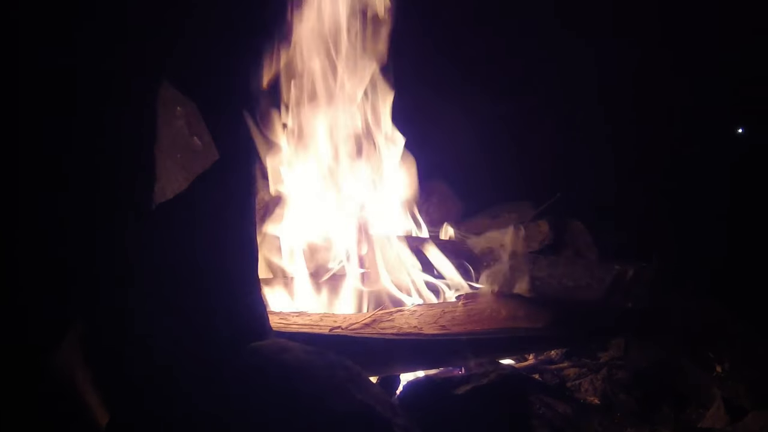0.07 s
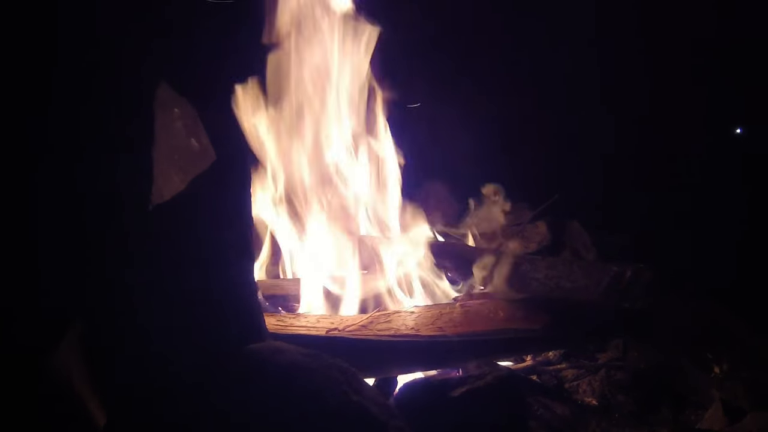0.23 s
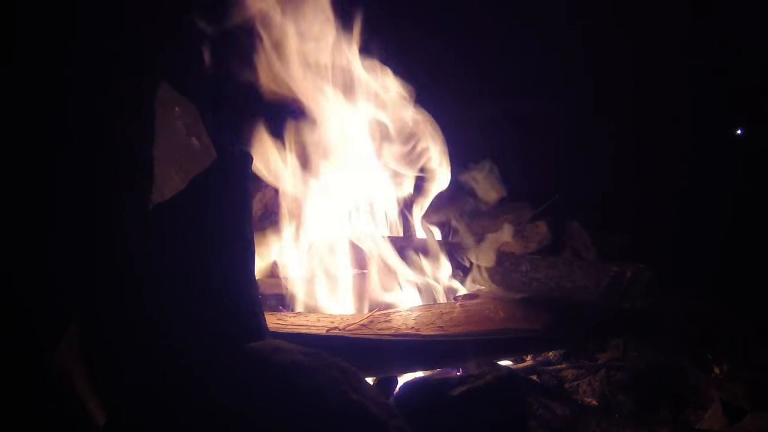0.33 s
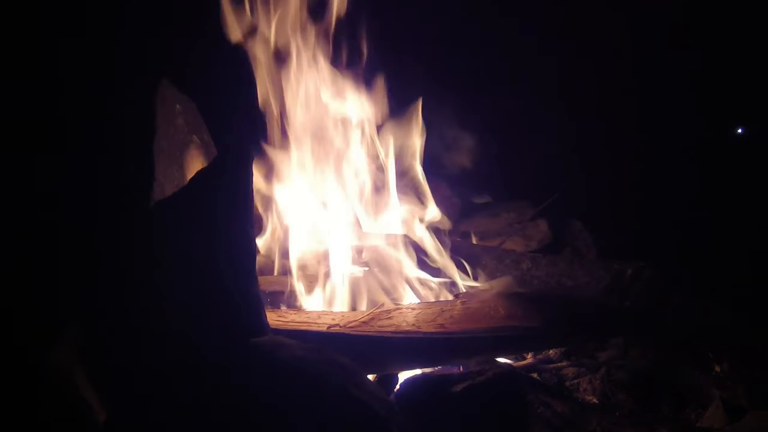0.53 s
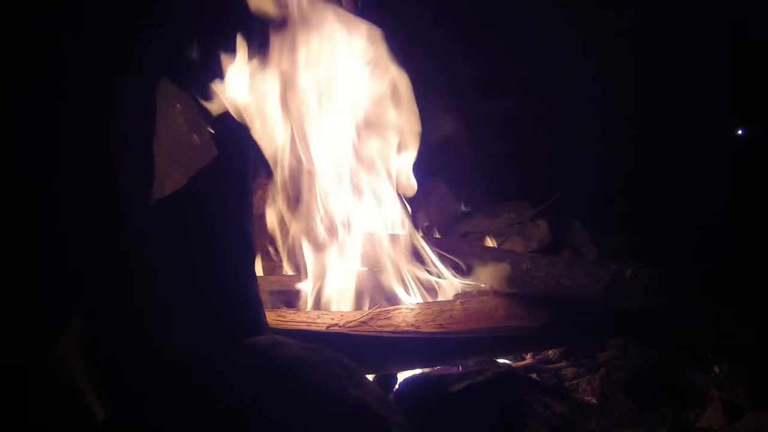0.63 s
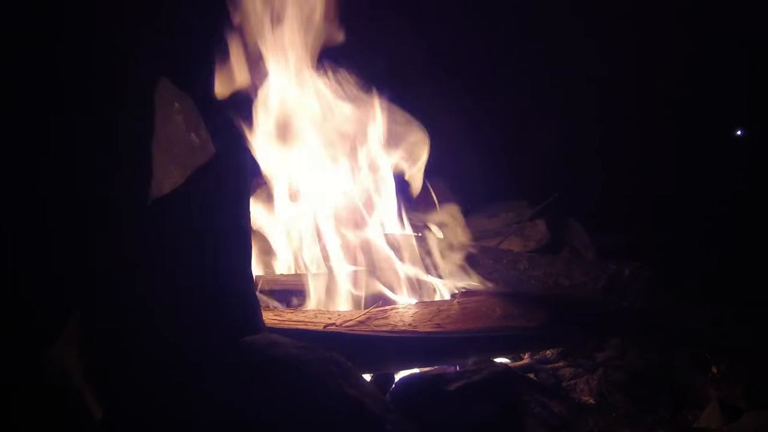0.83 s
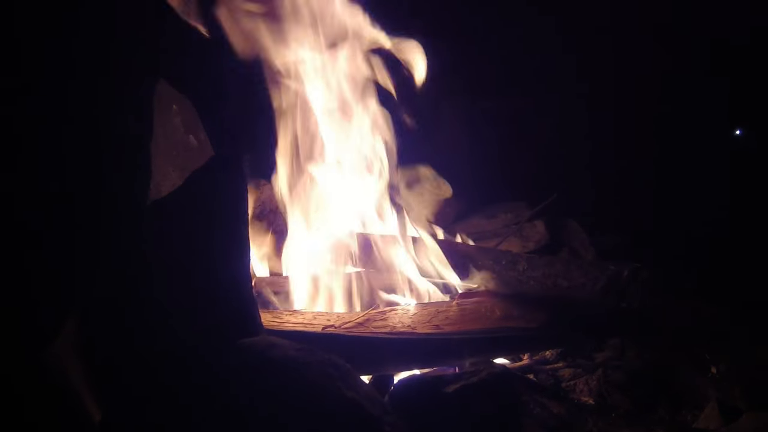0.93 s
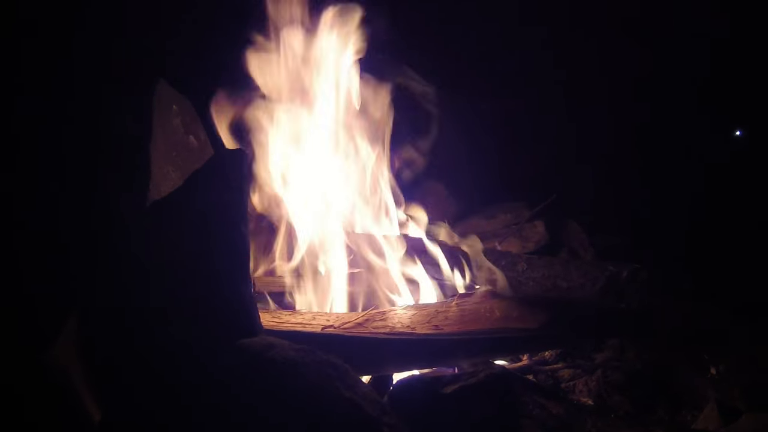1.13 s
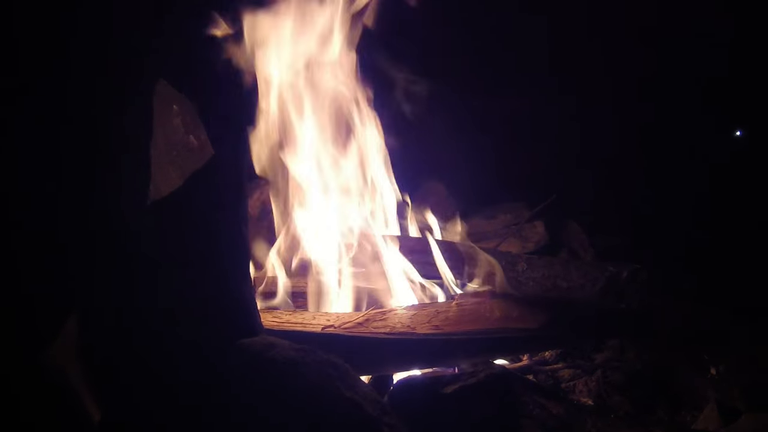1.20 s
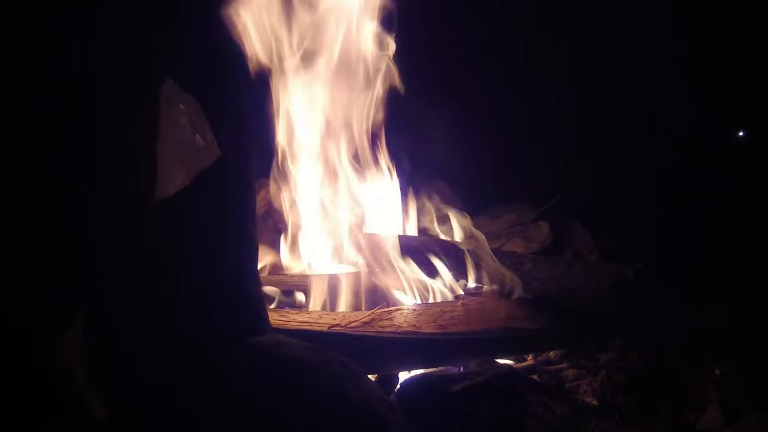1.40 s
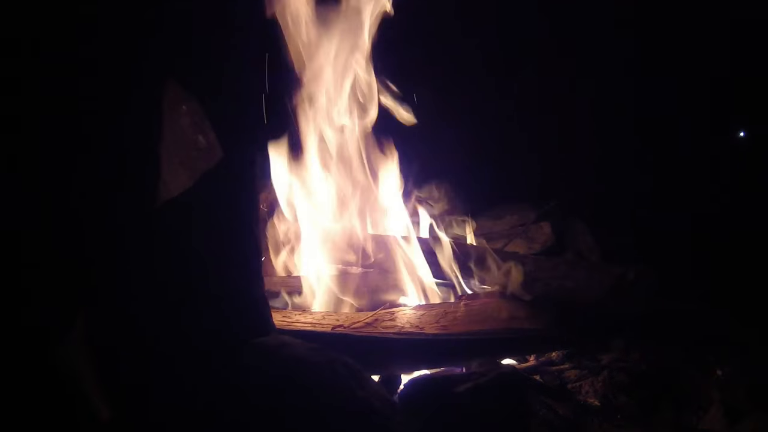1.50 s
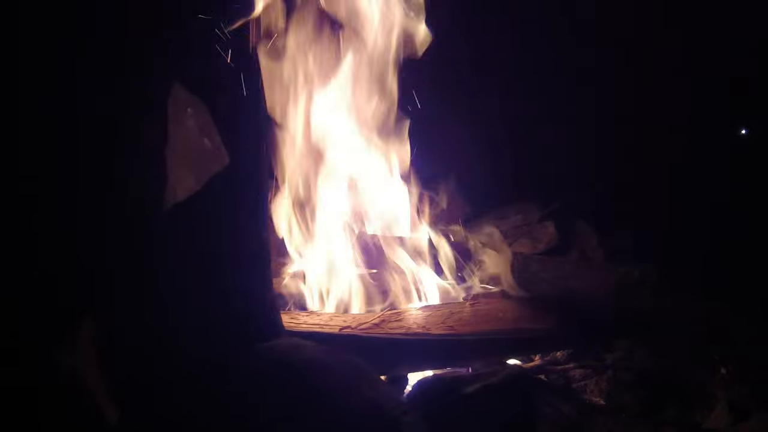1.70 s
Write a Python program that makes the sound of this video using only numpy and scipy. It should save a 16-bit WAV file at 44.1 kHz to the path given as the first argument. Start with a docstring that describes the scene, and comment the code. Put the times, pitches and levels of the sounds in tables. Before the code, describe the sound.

A wood fire crackles close by, with small snaps and two loud sharp pops.

```python
"""Outdoors at night, a wood fire burns close to a small microphone whose port resonates near 6 kHz.
The wood cracks in impulses followed by tearing fibres, spits a jet of steam, and twice pops loudly
as a bursting gas pocket rings a log with a hollow knock. Burning gas rumbles, sap sizzles, embers
tick and the surroundings return a faint echo. A preset gain curve stands for the recorder's limiter,
which ducks the background just before the last loud pop and holds it low."""
import sys
import numpy as np
from scipy import signal
from scipy.fft import rfft, irfft, next_fast_len
from scipy.io import wavfile
from scipy.ndimage import map_coordinates

SR = 44100
rng = np.random.default_rng(int(sys.argv[2]) if len(sys.argv) > 2 else 0)


def transcribe(signal):
    """Save signal, clipped to [-1, 1], as a 16-bit WAV file at the path in sys.argv[1]."""
    frames = np.atleast_2d(signal).T
    limited = np.clip(frames, -1, 1)
    pcm = np.round(limited * 32767).astype(np.int16)
    wavfile.write(sys.argv[1], SR, pcm)


N = 77175

# Spectrum of a crack heard through the resonant port: frequency_hz, gain_db
PORT_RESPONSE = [(30, -13), (120, -2), (250, -2), (600, 3), (1000, -8.5), (1500, -6), (2500, -8),
                 (3200, -9), (3900, -12.5), (5300, -0.5), (5900, 1), (6500, 3), (7100, 0), (7800, -9),
                 (9000, -7.5), (10800, -10.5), (11800, -24), (15000, -41)]


def amp(db):
    """Decibels to amplitude ratio."""
    return 10 ** (np.asarray(db) / 20)


def unit(x):
    """Normalisation to rms 1."""
    return x / np.sqrt(np.mean(x ** 2) + 1e-20)


def along(points, hz):
    """Interpolation of (frequency_hz, value) points on a log frequency axis."""
    knots_hz, values = np.transpose(points)
    return np.interp(np.log(hz + 1), np.log(knots_hz + 1), values)


def level(points):
    """Gain envelope interpolated from (time_s, level_db) points."""
    return amp(np.interp(np.arange(N) / SR, *np.transpose(points)))


def wobble(rate_hz):
    """Smooth random modulation: a spline through Gaussian knots."""
    knots = rng.standard_normal(int(N * rate_hz / SR) + 4)
    return map_coordinates(knots, [np.arange(N) * rate_hz / SR])


def colour(x, *spectra):
    """Minimum-phase filter whose gain is the sum of (frequency_hz, gain_db) spectra."""
    size = 2 * next_fast_len(len(x))
    hz = np.fft.rfftfreq(size, 1 / SR)
    gain = amp(sum(along(spectrum, hz) for spectrum in spectra))
    cepstrum = irfft(np.log(gain), size)
    cepstrum[1:size // 2] *= 2  # folding onto positive time makes the filter causal
    cepstrum[size // 2 + 1:] = 0
    return irfft(rfft(x, size) * np.exp(rfft(cepstrum)), size)[:len(x)]


def fade(t, t60_s):
    """Exponential decay, 60 dB in t60_s."""
    return amp(-60 * t / max(t60_s, 1e-4))


def burst(t, t60_s):
    """Exponentially damped noise of energy 1."""
    noise = rng.standard_normal(len(t)) * fade(t, t60_s)
    return noise / np.linalg.norm(noise)


def add(track, start_s, x):
    """Superposition of x on the track."""
    part = track[max(round(start_s * SR), 0):][:len(x)]
    part += x[:len(part)]


def cracks():
    """Brittle fracture: an impulse, a brief tearing of fibres and scattering among the logs."""
    # Fractures: start_s, energy_db, body_db, low_mid_db, high_mid_db, top_db, air_db, tear_t60_s
    fractures = [(0.051, -27.5, 0, -5, -15, -25.5, -4, .003),
                 (0.0596, -27, -20, -3.5, -5, -8.5, -13, 0.0055),
                 (0.0774, -37, -11, -7, -14, 1.5, -2, .002), (0.1347, -25.5, -4, -9, -24, -20, -25, 0.0033),
                 (0.2317, -14.5, 15.5, -15, -1, -9, -3, 0.019), (0.237, -15, -5, -32, -18, -9, 0, 0.016),
                 (0.2837, 2.5, 3, 7.5, 4, -23, -28, 0.013), (.2963, 0, -3, 1.5, -2, -8, -7, .007),
                 (0.329, -21.5, -7, -5, -9, -15, -10, 0.0037),
                 (0.4314, -30.5, -11, -18, -18, -9, -15, .003),
                 (0.5292, -24, -13, -4, -11, -11, -8, 0.0037), (0.7512, -34.5, 2, 17, 10, 6, 9, .003),
                 (0.869, -28, -16, 5, -8, -5, 0, .004), (.8869, -23.5, -13, -6, 4, -4, -1, 0.00067),
                 (1.0175, -32.5, -7, 0, -3, -3, 0, .002), (1.1667, -16, -15, -8, 5, -12, -1, 0.0019),
                 (1.2622, -29, -13, -6, -7, -8, -11, 0.0043), (1.3331, -26.5, -11.5, 1, -9, -12, 6, 0.0028),
                 (1.3901, -28.5, -2, -3, -4, -6, -4, 0.0024), (1.4009, -15, -6, -4.5, 2, -20, -10, 0.0079),
                 (1.4773, 6, -1, -8.5, 3, 8.5, -2, 0.0065), (1.5136, -21.5, 4, -3, 3.5, -20, -4, 0.0029),
                 (1.5521, -30.5, -4, 5.5, 14, -2, -8.5, 0.003)]
    # Body, low mid, high mid, treble (the 0 dB reference), top and air bands: centre_hz
    band_centres = [600, 1500, 2700, 6000, 10000, 12500]
    # Tearing fibres, thinner than the snap: frequency_hz, gain_db
    fibre_spectrum = [(100, -14), (900, -5.5), (2500, 5), (6000, 0.5)]
    # Scattering among the logs: frequency_hz, gain_db
    scatter_spectrum = [(100, 6), (600, -2), (1500, -3), (6500, 1.5), (8000, 2.5), (10000, -1)]
    out, t = np.zeros(N), np.arange(SR // 16) / SR
    for start_s, energy_db, body, low, high, top, air, tear_t60_s in fractures:
        tear_gain = amp(2) * np.sqrt(tear_t60_s / 0.0036)  # energy grows with duration
        tear = tear_gain * colour(burst(t, tear_t60_s), fibre_spectrum)
        scatter = amp(-5) * colour(burst(t, t60_s=0.023), scatter_spectrum)
        excitation = tear + scatter
        excitation[0] = 1  # the impulse
        band_gains = list(zip(band_centres, (body, low, high, 0, top, air)))
        snap = colour(excitation, PORT_RESPONSE, band_gains)
        add(out, start_s, amp(energy_db) * snap / np.linalg.norm(snap))
    return out


def knocks(rise_s=0.0005):
    """Damped free vibration: a bursting gas pocket excites the modes of a log."""
    # Hollow ringing of the logs: start_s, pitch_hz, level_db, t60_s
    log_modes = [(0.2861, 67, -15, 0.041), (0.2871, 256.5, -16, 0.025), (.2872, 732, -39, 0.097),
                 (1.4774, 255, -15.5, 0.01), (1.4775, 738, -13, 0.011), (1.5136, 214, -39, 0.029)]
    out, t = np.zeros(N), np.arange(SR // 8) / SR
    for start_s, pitch_hz, level_db, t60_s in log_modes:
        omega = 2 * np.pi * pitch_hz
        swing = np.sin(omega * t) * fade(t, t60_s) * (1 - np.exp(-t / rise_s))
        add(out, start_s, amp(level_db) * np.gradient(swing, t) / omega)
    return out


def steam_jet(start_s=0.232, rise_s=0.00063):
    """Jet noise: steam escapes from a split and dies away as the pressure falls."""
    # Hiss of the jet: frequency_hz, gain_db
    jet_spectrum = [(40, 7), (250, 13), (700, 0), (1300, -10), (2800, -5), (3900, -15), (5400, 3),
                    (6500, -14), (7800, 8), (9500, -20), (13500, -12), (15000, -32)]
    t = np.maximum(np.arange(N) / SR - start_s, 0)
    hiss = unit(colour(rng.standard_normal(N), jet_spectrum))
    envelope = (1 - np.exp(-t / rise_s)) * fade(t, t60_s=0.18)
    return amp(-38.5) * hiss * envelope


def flames(flutter_db=0.8):
    """Combustion noise: burning gas gives a low rumble with random amplitude modulation."""
    # Spectral density of the rumble: frequency_hz, density_db
    flame_spectrum = [(12, -35), (22, -5), (55, 1), (85, -7), (124, -9.5), (184, -15), (245, -17.5),
                      (335, -21.5), (420, -32.5), (600, -32), (1300, -68)]
    # Level of the rumble: time_s, level_db
    flame_levels = [(0, -38.5), (.06, -46.5), (.1, -49), (.15, -47), (.23, -40), (.33, -40), (.42, -48.5),
                    (.6, -44), (.75, -48.5), (.88, -45.5), (1.03, -45), (1.2, -48), (1.32, -46),
                    (1.42, -44), (1.45, -49.5), (1.56, -54.5), (1.64, -49), (1.75, -53.5)]
    flutter = amp(flutter_db * wobble(rate_hz=30))
    rumble = colour(rng.standard_normal(N), flame_spectrum)
    return level(flame_levels) * unit(flutter * rumble)


def embers(ticks_per_s=60, spread_db=3.3, sway_db=0.5):
    """Broadband noise of sizzling sap, dotted with a Poisson process of tiny ticks."""
    # Spectral density of the sizzle: frequency_hz, density_db
    sizzle_spectrum = [(200, -13.5), (400, 1), (520, -1), (700, -1.5), (1000, -4.5), (1500, -6.5),
                       (2500, -8), (3600, -12), (4500, -12.5), (5300, -3), (5900, -7), (6500, 1),
                       (7100, -6.5), (7800, -6.5), (9000, -11.5), (10300, -18.5), (13200, -18),
                       (14200, -42)]
    sizzle_gain = amp(-56.5 + sway_db * wobble(rate_hz=23.74))
    sizzle = sizzle_gain * unit(colour(rng.standard_normal(N), sizzle_spectrum))
    tick_sizes = amp(-46 + spread_db * np.minimum(rng.exponential(size=N), 3))
    ticks = tick_sizes * (rng.random(N) < ticks_per_s / SR)
    return sizzle + colour(ticks, PORT_RESPONSE)


def surroundings(x):
    """Reverberation: convolution with a faint noise tail in which the bass lasts longest."""
    # Outdoor decay times: frequency_hz, t60_s
    decay_times = [(60, .3), (250, 0.42), (1000, 0.18), (6000, 0.094), (12000, 0.13)]
    hz, t, spectrogram = signal.stft(rng.standard_normal(SR // 2), SR, nperseg=256)
    decay = amp(-60 * t / along(decay_times, hz)[:, None])
    tail = signal.istft(spectrogram * decay, SR, nperseg=256)[1]
    return amp(-20.5) * signal.fftconvolve(x, tail / np.linalg.norm(tail))[:N]


def scene():
    """Superposition: pops in front; flames, embers and echo behind them."""
    # Background level: it drifts gently, then the recorder's limiter ducks it just before
    # the last loud pop and holds it low: time_s, gain_db
    bed_gains = [(0, -1), (.2, -3), (.37, 0.5), (.6, -1), (1.0, -1), (1.3, -2), (1.432, -.5), (1.447, -9.5),
                 (1.52, -4.5), (1.6, -8.5), (1.75, -8)]
    pops = cracks() + knocks() + steam_jet()
    bed = level(bed_gains) * (embers() + surroundings(pops))
    return (pops + bed + flames())[None]


def record(dry, cutoff_hz=15000):
    """Band limiting: the recorder's steep low-pass filter removes the highest treble."""
    return signal.sosfilt(signal.ellip(10, .1, 90, cutoff_hz, fs=SR, output="sos"), dry)


dry = scene()
out = record(dry)
transcribe(out)
```